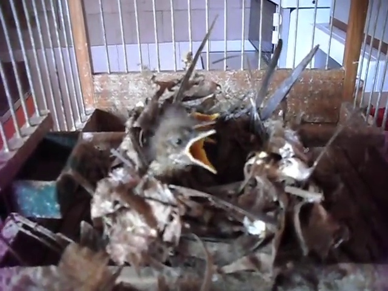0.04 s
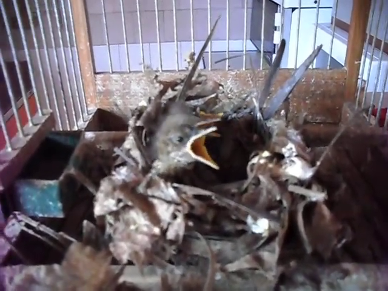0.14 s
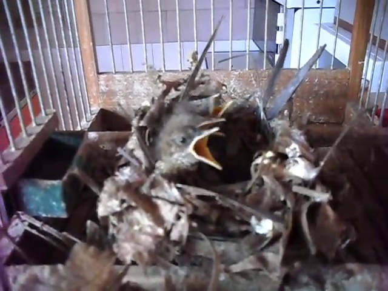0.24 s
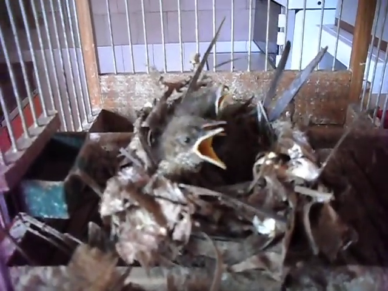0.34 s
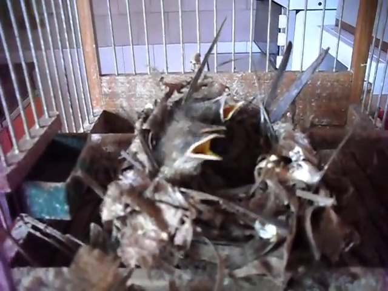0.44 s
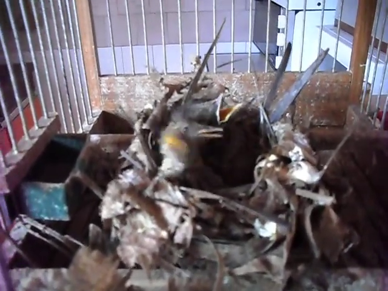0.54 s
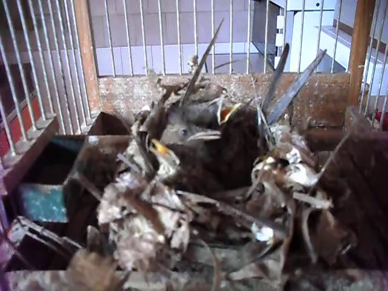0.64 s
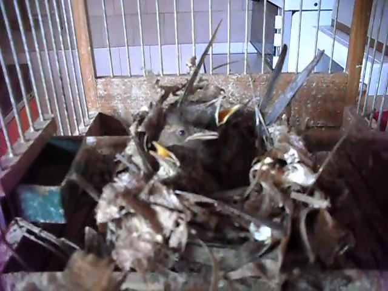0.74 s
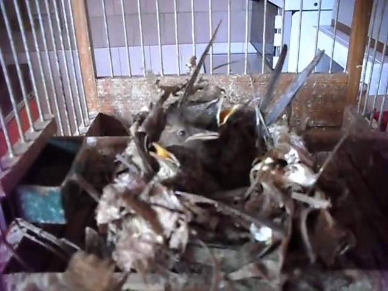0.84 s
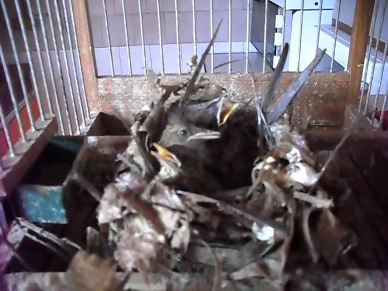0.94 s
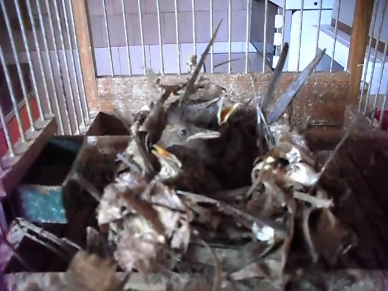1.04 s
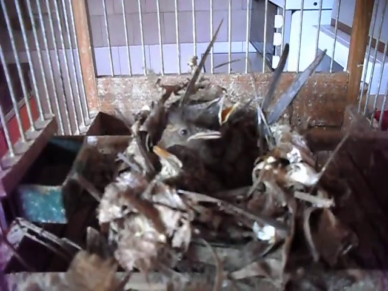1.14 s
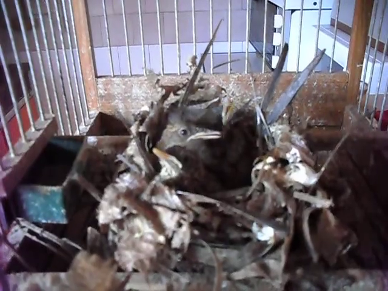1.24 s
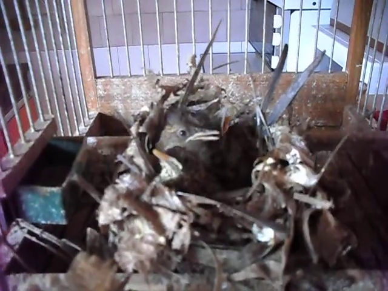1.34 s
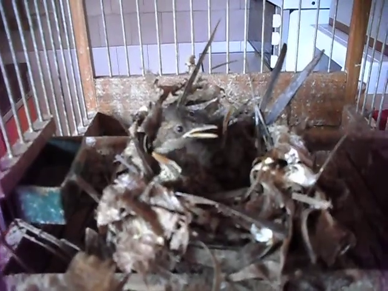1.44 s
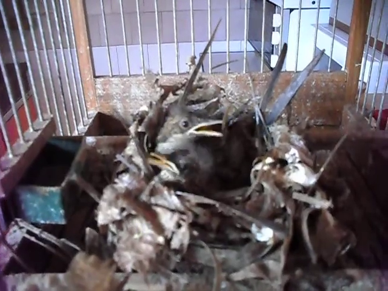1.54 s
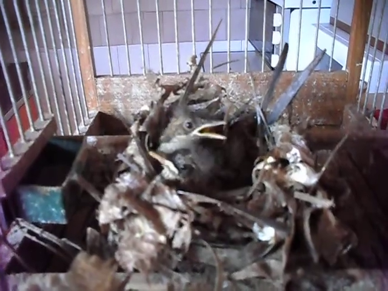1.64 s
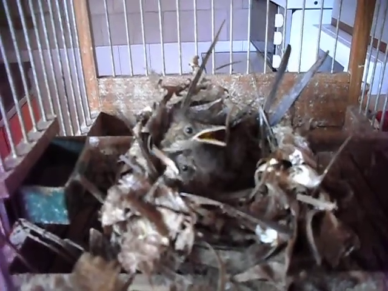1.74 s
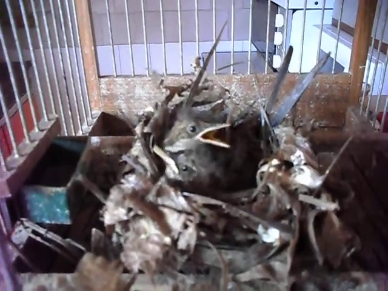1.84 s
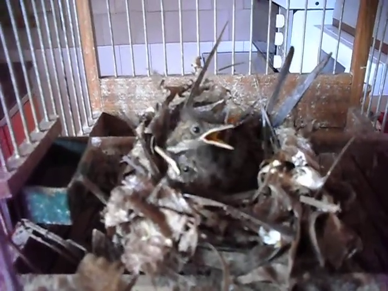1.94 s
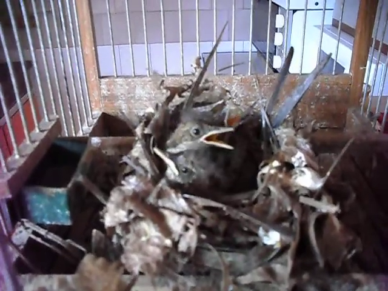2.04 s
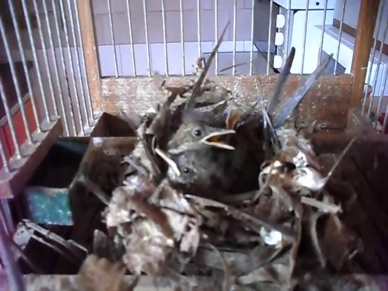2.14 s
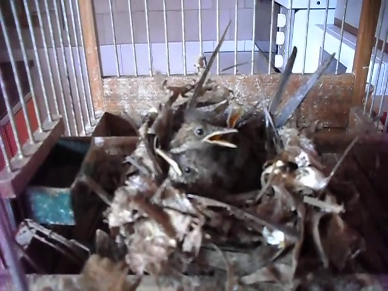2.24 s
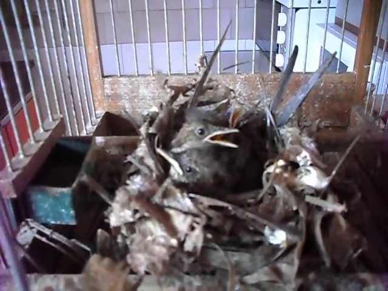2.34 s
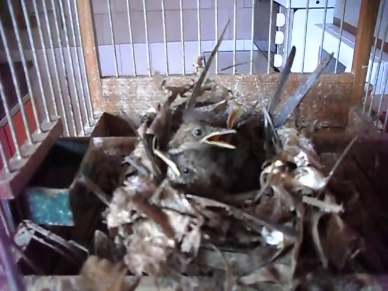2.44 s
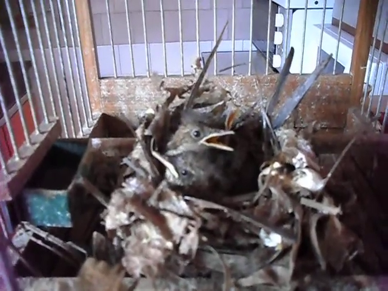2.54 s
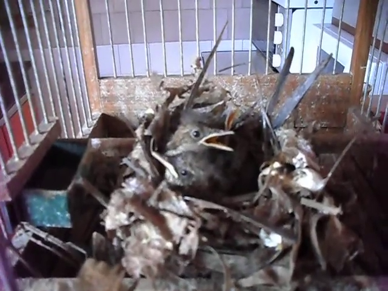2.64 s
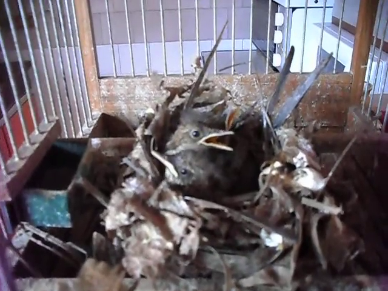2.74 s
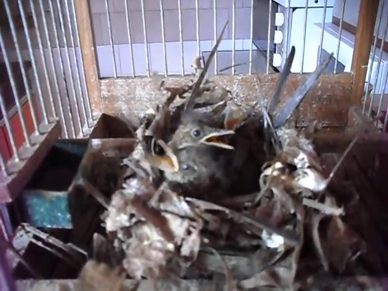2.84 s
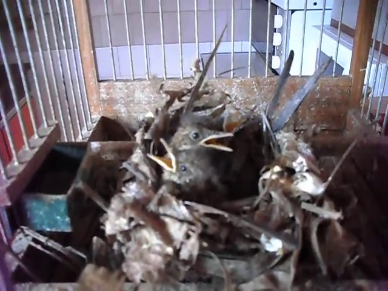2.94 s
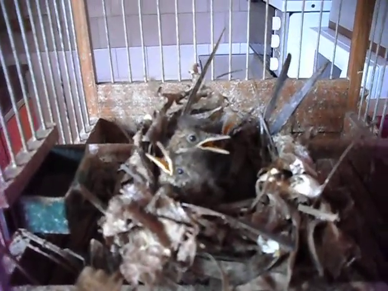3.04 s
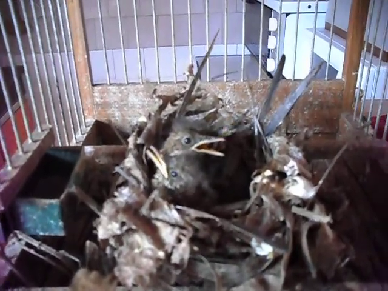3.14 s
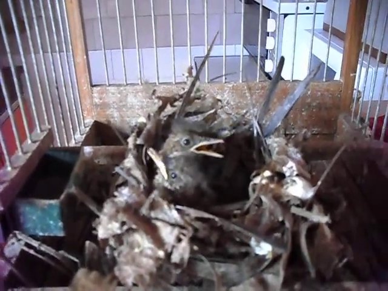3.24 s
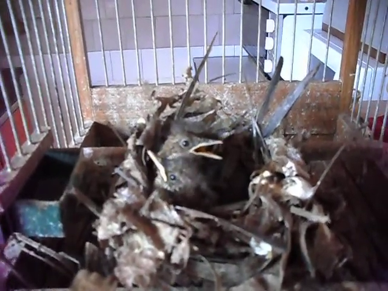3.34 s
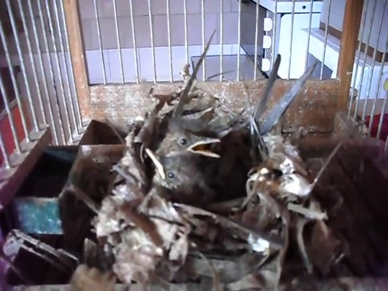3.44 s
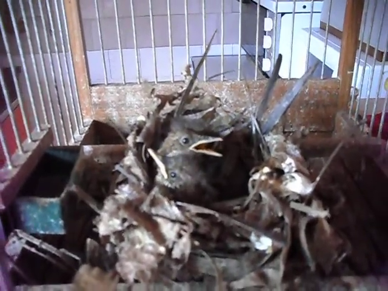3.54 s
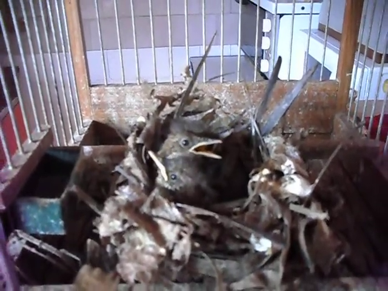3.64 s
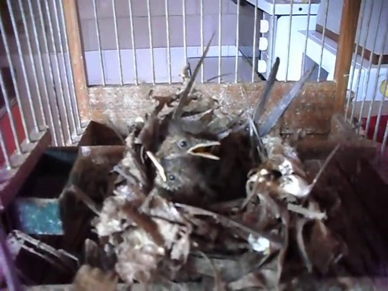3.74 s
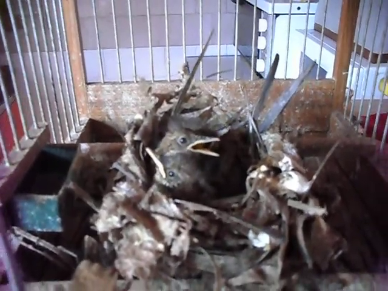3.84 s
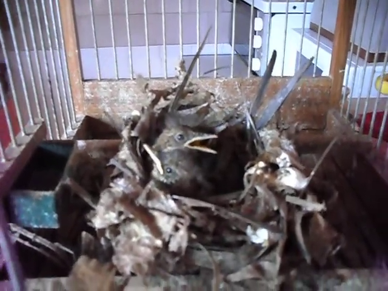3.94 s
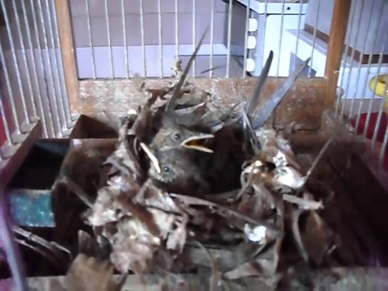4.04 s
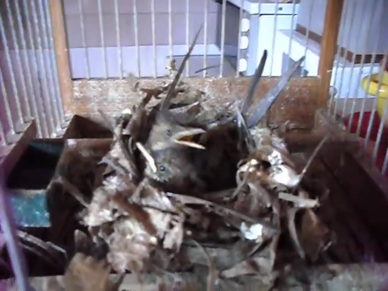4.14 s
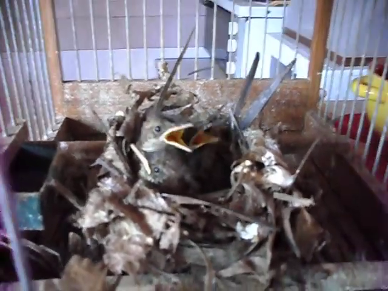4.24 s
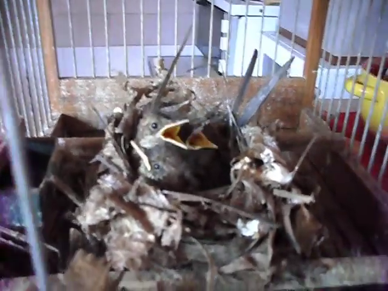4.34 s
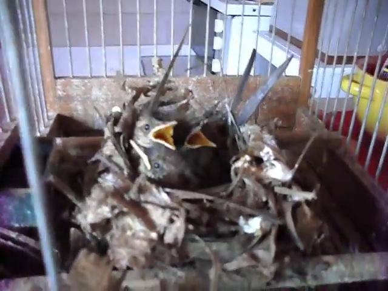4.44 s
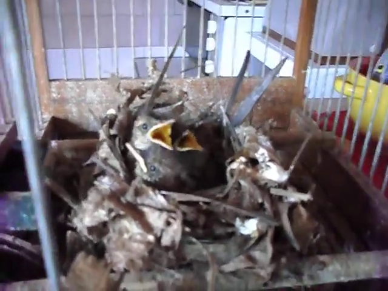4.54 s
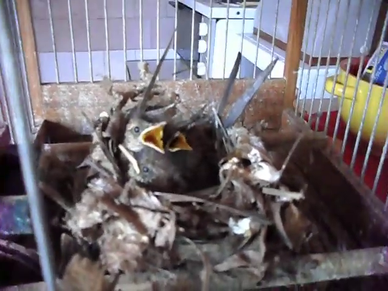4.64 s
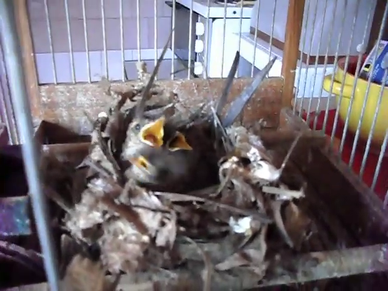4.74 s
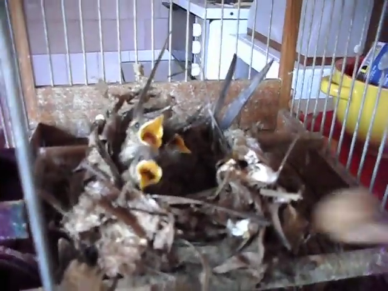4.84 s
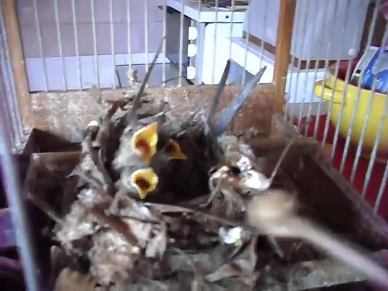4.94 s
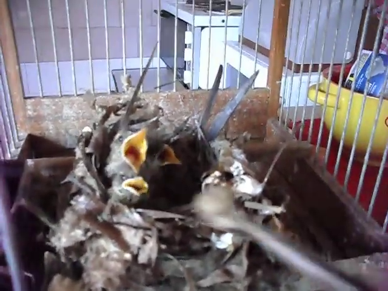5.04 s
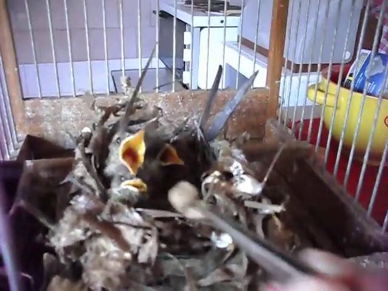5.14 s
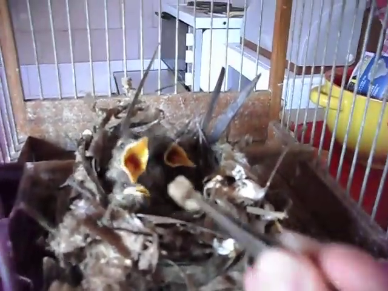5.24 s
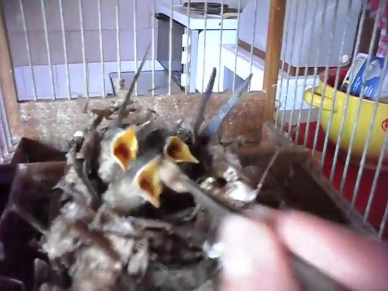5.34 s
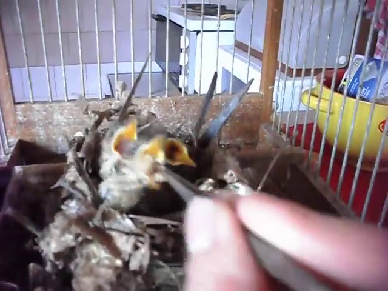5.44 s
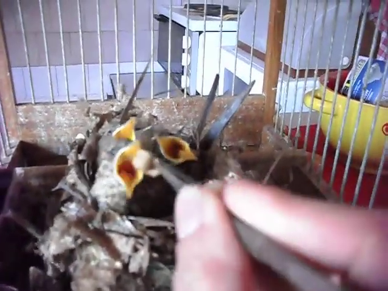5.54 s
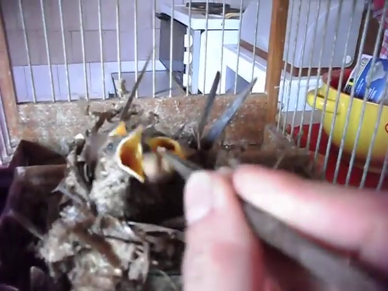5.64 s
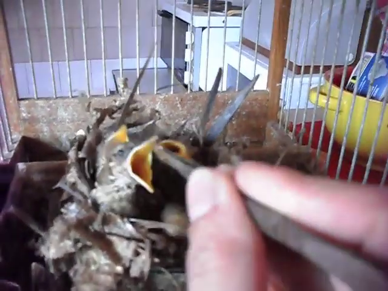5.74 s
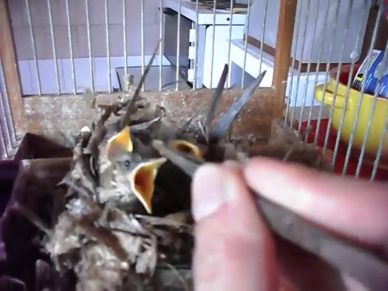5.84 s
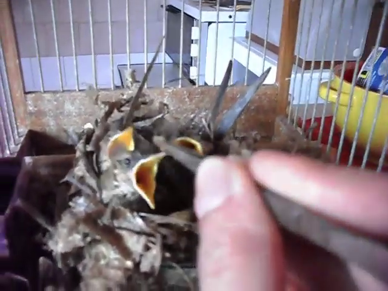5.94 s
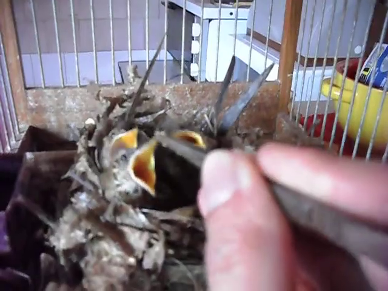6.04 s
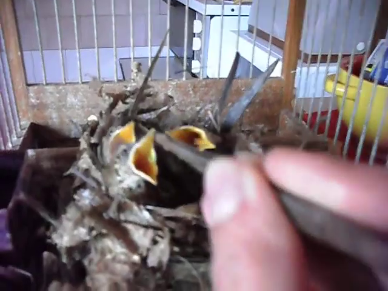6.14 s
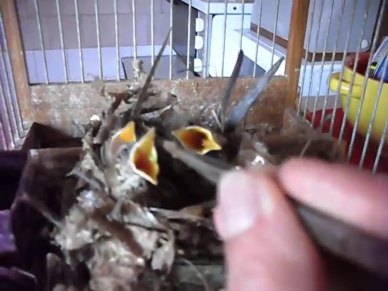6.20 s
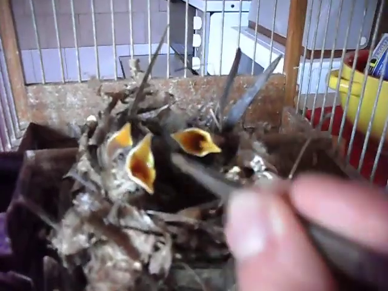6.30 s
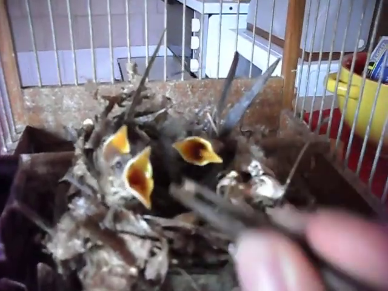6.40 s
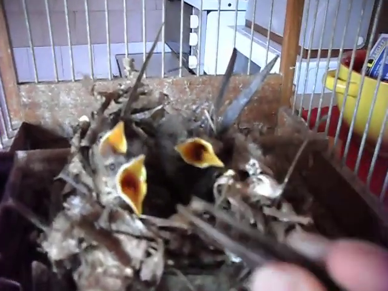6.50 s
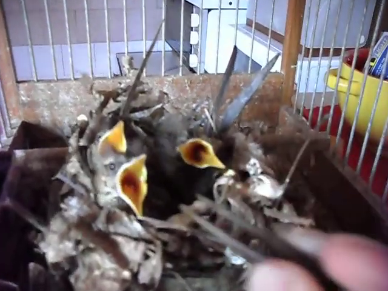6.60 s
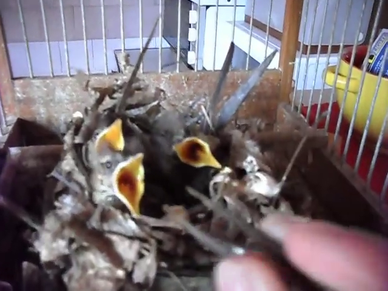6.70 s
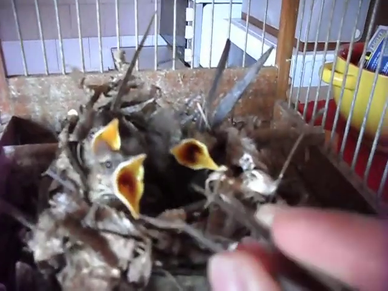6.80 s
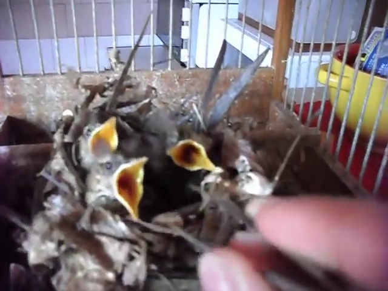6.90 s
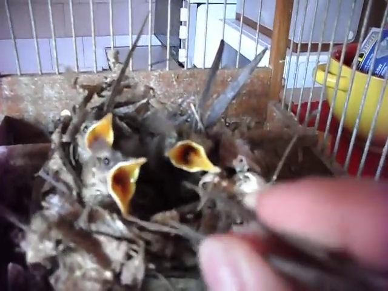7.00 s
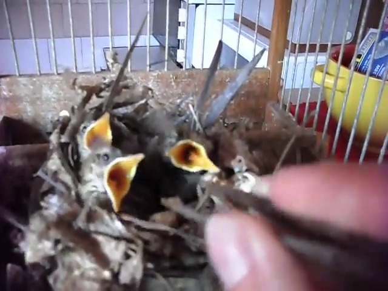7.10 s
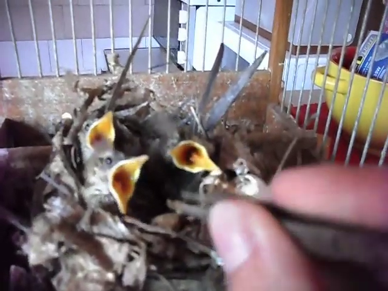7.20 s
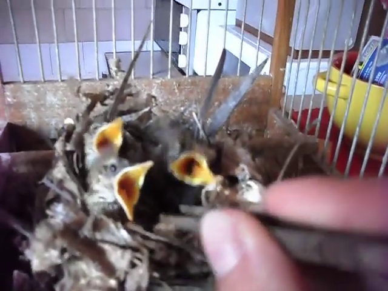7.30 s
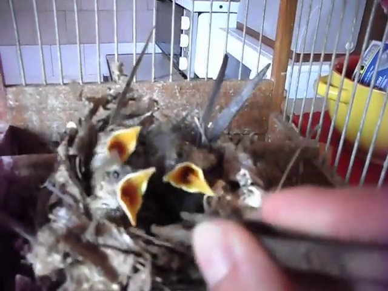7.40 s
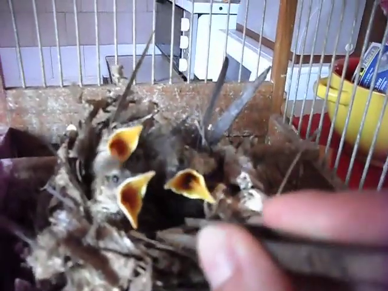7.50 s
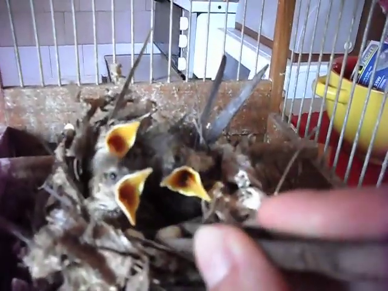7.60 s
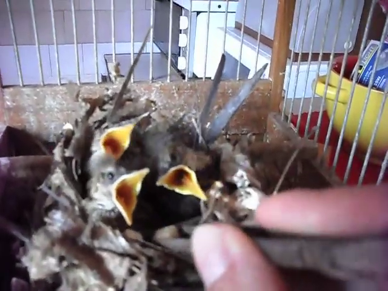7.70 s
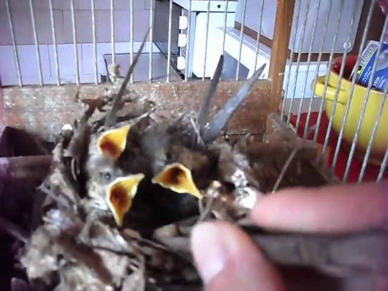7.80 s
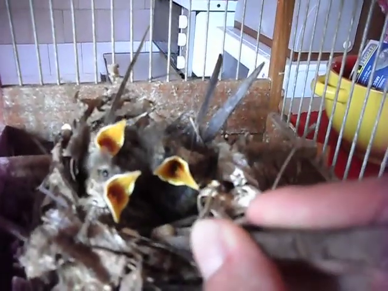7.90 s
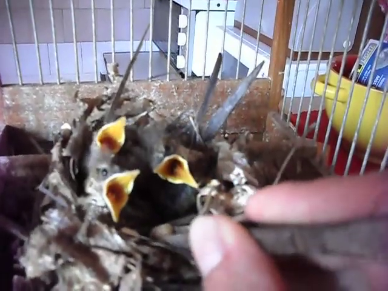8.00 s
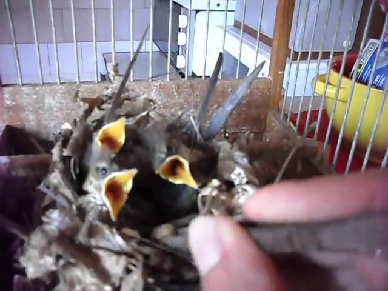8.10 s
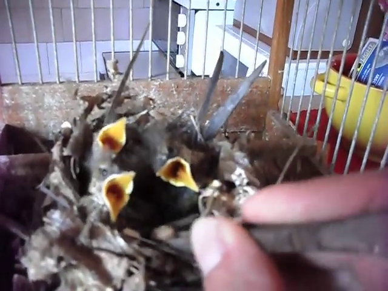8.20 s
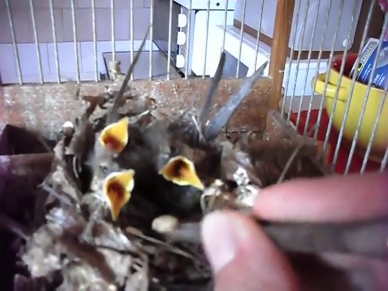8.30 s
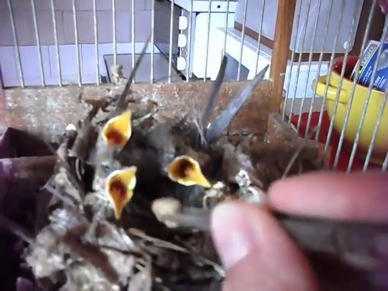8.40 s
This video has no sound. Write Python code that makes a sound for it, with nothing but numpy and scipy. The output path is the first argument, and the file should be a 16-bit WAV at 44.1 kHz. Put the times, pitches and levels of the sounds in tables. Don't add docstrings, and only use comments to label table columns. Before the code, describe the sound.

A compact camera close to a nest picks up irregular shrill chirps and rough clicking chacks, with quieter gaps of tiny peeps. A short flurry of chacks leads into frantic begging: two main chicks calling about eight times a second each, pitches swooping down and up, interleaved and piercing, the loudest squeaks slightly clipped. A few tiny dry ticks hide below. Short bright kitchen reflections, constant soft hiss and faint low hum.

```python
import sys
import numpy as np
from scipy import signal
from scipy.fft import rfft, irfft, next_fast_len
from scipy.io import wavfile
from scipy.ndimage import uniform_filter1d

SR = 44100
rng = np.random.default_rng(int(sys.argv[2]) if len(sys.argv) > 2 else 0)


def field_ratio(decibels):
    return 10 ** (np.asarray(decibels, dtype=float) / 20)


def digitize_waveform(pressure):
    field = np.atleast_2d(pressure).T
    bounded = np.clip(field, -1, 1)
    quanta = np.round(bounded * 32767).astype(np.int16)
    wavfile.write(sys.argv[1], SR, quanta)


N = 373086
CHANCE = rng.standard_normal(N + SR)

# frequency_hz, density_db [dB per Hz]
HISS_SPECTRUM = [(25, 5.5), (300, -7.5), (700, -11.5), (2100, -16), (10500, -24.5), (11500, -47),
                 (13000, -72)]
# frequency_hz, level_db
DRIVE_HUM = [
    (30.2, -53.5),
    (60.4, -63),
    (123, -72),
]
# start_s, beat_s, opening_fall_db, arch_db, arch_top_hz
SHORT_CALLS = [(.045, .034, -19.5, -13.5, 9240), (.686, .031, -26, -24, 8280),
               (1.268, .032, -25, -24, 7850), (2.016, 0.032, -29.5, -25, 8480),
               (2.158, .031, -25, -23, 8360), (2.798, 0.03, -22, -26, 7500), (2.9, .0275, -19, -17, 9640),
               (2.932, .0285, -40, -15, 9300), (3.007, .0315, -20, -16, 9000),
               (4.175, 0.027, -25, -43, 7850), (4.672, .029, -28, -24.5, 10030),
               (4.896, 0.028, -17.5, -14, 9900), (5.267, 0.024, -28, -30.5, 7640)]
# start_s, beat_s, opening_fall_db, arch_db, arch_top_hz
LONG_CALLS = [(.372, 0.028, -25, -23, 8600), (.53, 0.028, -26, -24, 8200), (1.119, 0.025, -22, -24, 8000),
              (4.313, .027, -29, -23.5, 8280), (4.787, .0295, -17, -14, 10120),
              (5.313, 0.026, -22, -14.5, 8600)]
# start_s, beat_s, opening_fall_db, arch_db, arch_top_hz
BOLD_CALLS = [(5.342, 0.028, -16, -20, 9500), (5.44, 0.041, -21, -20, 9000), (5.542, .028, -17, -14, 11000),
              (5.677, 0.022, -19.5, -16, 11200), (5.811, .027, -19.5, -16, 10600),
              (5.934, 0.03, -17.5, -16.5, 10200), (6.058, 0.03, -17.5, -17.5, 10400),
              (6.181, 0.027, -17, -16.5, 9700), (6.303, 0.03, -14.5, -16, 10800),
              (6.43, .028, -17, -16.5, 10200), (6.556, .0305, -19, -18, 9700),
              (6.676, .028, -14, -12, 9900), (6.8, .033, -14, -9, 9400), (6.934, 0.036, -10.5, -8, 9100),
              (7.06, .031, -12.5, -14, 9200), (7.183, 0.033, -15, -14.5, 10200),
              (7.303, .029, -18, -15.5, 9600), (7.432, 0.031, -17, -27.5, 8200),
              (7.573, 0.025, -17, -26, 8200), (7.703, 0.024, -17, -19, 8200),
              (7.836, 0.028, -16.5, -19.5, 9300), (7.972, 0.029, -16.5, -15, 9000),
              (8.25, 0.031, -16.5, -14.5, 9700), (8.38, 0.025, -19, -23, 8200)]
# start_s, beat_s, opening_fall_db, arch_db, arch_top_hz
STAIR_CALLS = [(5.43, 0.032, -18, -17, 8300), (5.575, 0.029, -17.5, -16, 8400),
               (5.712, 0.03, -15, -18, 8700), (5.85, 0.023, -17.5, -16.5, 8800),
               (5.985, .0245, -19, -18, 8700), (6.115, 0.026, -17, -17.5, 8500),
               (6.249, .027, -16, -17.5, 8100), (6.383, 0.029, -17.5, -19, 8300),
               (6.531, 0.027, -16, -25, 8400), (6.682, .028, -23, -24, 7400), (6.81, .0275, -17, -18, 9200),
               (6.945, 0.024, -22, -28, 8600), (7.083, 0.028, -15, -17.5, 8600),
               (7.229, 0.031, -19.5, -18, 8600), (7.376, 0.031, -15, -18.5, 8600),
               (7.521, .03, -16.5, -17.5, 8600), (7.665, 0.028, -16.5, -18.5, 8200),
               (7.814, 0.026, -18.5, -19, 8200), (7.956, 0.027, -18.5, -18, 8200),
               (8.116, .0285, -22, -21, 8300), (8.278, 0.026, -16.5, -17.5, 8800),
               (8.427, 0.031, -18, -18, 9600)]
# start_s, beat_s, opening_fall_db, arch_db, arch_top_hz
FAINT_CALLS = [(.036, 0.012, -30, -35, 9000), (.11, .02, -23, -35, 8000), (5.378, 0.032, -15, -21, 8600),
               (6.234, 0.039, -29, -33, 9000), (6.371, .026, -27, -38, 9000),
               (6.507, 0.028, -24.5, -29, 9400), (6.635, .025, -24, -32, 10200),
               (6.788, .025, -26, -33, 9000)]
# start_s, length_s, level_db, gape_hz
FADING_BREATH = (-0.15, 0.05, -37.5, 7500)
# start_s, level_db, gape_hz
CHACK_EVENTS = [(.208, -16.5, 5190), (.236, -13, 5630), (.275, -25, 5770), (.345, -14, 5600),
                (.501, -3, 4910), (.527, -21, 4400), (0.848, -20.5, 4640), (.878, -18, 4730),
                (1.001, -16, 4800), (1.028, -15, 5200), (1.479, -13, 3300), (1.503, -13, 3000),
                (3.115, -8.5, 4410), (3.144, -9, 3820), (3.208, -8, 4200), (3.272, -11, 2400),
                (3.296, -12, 2300), (5.05, -10.5, 5250), (5.077, -9.5, 4970), (5.109, -27, 4350),
                (5.163, -9, 4570), (5.188, -9.5, 4410), (5.208, -19.5, 5030), (5.23, -15.5, 5200)]
# start_s, top_hz, level_db
PEEP_EVENTS = [(1.417, 8170, -40.5), (1.534, 7040, -36), (1.7797, 6660, -40), (2.3136, 7300, -42.5),
               (2.488, 6600, -40.5), (3.453, 6930, -42), (3.607, 6400, -39.5), (3.754, 6600, -40.5),
               (3.874, 9200, -33), (4.055, 6800, -39.5)]
# time_s, pitch_hz, level_db
WHISTLE_VOICES = [
    [(1.851, 5260, -61), (1.858, 4430, -42), (1.875, 4800, -45)],
    [(1.879, 6660, -25), (1.895, 6770, -21), (1.9, 6480, -19), (1.922, 6790, -47)],
    [(2.77, 7800, -31), (2.782, 7480, -19), (2.818, 7690, -9), (2.828, 7470, -16), (2.836, 6470, -18),
     (2.85, 6370, -31)],
    [(2.77, 8830, -39), (2.78, 9090, -26), (2.806, 9100, -15), (2.826, 7800, -25)],
    [(4.193, 3900, -15), (4.201, 6670, -32), (4.208, 6770, -23), (4.222, 6260, -31)],
    [(5.0, 3730, -44), (5.035, 3700, -40)],
    [(8.093, 6440, -25), (8.102, 7085, -17), (8.136, 6973, -13.5), (8.154, 7250, -31)],
    [(8.09, 8470, -20), (8.108, 8870, -8), (8.14, 8420, -11.5), (8.153, 7040, -22)],
]
# start_s, level_db
TWEEZER_TICKS = [
    (6.179, -30),
    (6.838, -31),
    (7.071, -29),
    (8.115, -35.5),
]
# frequency_hz, gain_db
THROAT_RESPONSE = [(1000, -8.5), (1500, -7.5), (2500, -7.5), (4500, -6), (6000, -5), (9000, 0), (10300, -6),
                   (11000, -19), (12500, -12.5), (13200, -55)]
# frequency_hz, t60_s
ROOM_DECAY = [(2000, 0.27), (5000, 0.34), (10000, 0.27)]


def read(points, hz):
    table_hz, value = np.transpose(points)
    return np.interp(np.log(hz + 1), np.log(table_hz + 1), value)


def colour(x, points):
    size = next_fast_len(N)
    gain = field_ratio(read(points, np.fft.rfftfreq(size, 1 / SR)))
    return irfft(rfft(x, size) * gain, size)[:N]


def add(mix, s, sound):
    part = mix[max(round(s * SR), 0):][:len(sound)]
    part += sound[:len(part)]


def wobble(s, size, span):
    return uniform_filter1d(CHANCE[round(s * SR):][:size], span) * np.sqrt(span)


def phase(pitch):
    return 2 * np.pi * np.cumsum(pitch) / SR


def camera():
    hiss = colour(rng.standard_normal(N), HISS_SPECTRUM)
    out = field_ratio(-49.5) * hiss / hiss.std()
    t = np.arange(N) / SR
    for k, (hz, level_db) in enumerate(DRIVE_HUM):
        drift = 0.43 * wobble(k / 10, N, span=9000)
        out += np.sqrt(2) * field_ratio(level_db) * np.sin(2 * np.pi * hz * t + drift)
    return out


def tension(tops):
    tops, t = np.sort(tops), np.arange(N + SR) / SR
    after = np.clip(np.searchsorted(tops, t), 1, len(tops) - 1)
    slackening = np.exp(-abs(t - tops[after - 1]) / .007)
    tightening = 0.66 * np.exp(-abs(tops[after] - t) / 0.0057)
    return np.maximum(slackening, tightening)


def rasp(pull, s, length, level_db, gape_hz, fade_db, cut_db, pipe_db=0):
    t = np.arange(0, length + 0.0045, 1 / SR)
    slaps = wobble(s + .6, len(t), span=1) * field_ratio(-9)
    tight = 2.6 ** pull[round(s * SR):][:len(t)]
    for side_hz in (1750, 2700):
        slow = 0.078 * wobble(s + side_hz / SR, len(t), span=300)
        fast = 0.038 * wobble(s + .3, len(t), span=12)
        pitch = side_hz * tight * (1 + slow + fast)
        angle = phase(pitch)
        slaps = slaps + sum((k * pitch < 14000) * np.cos(k * angle) for k in range(1, 7)) / 2

    octaves = np.log2((np.fft.rfftfreq(len(t), 1 / SR) + 1) / gape_hz)
    above = np.minimum(cut_db * octaves ** 2, 42)
    below = np.minimum(5 * octaves ** 2, 14)
    loss_db = np.where(octaves > 0, above, below)
    if pipe_db == 0:
        loss_db = loss_db + 6 * np.sin(np.pi * (octaves + np.log2(gape_hz / 2450))) ** 2
    loss_db = loss_db + pipe_db * np.sin(np.pi * gape_hz * 2 ** octaves / 2350) ** 2
    voice = irfft(rfft(slaps * signal.windows.tukey(len(t), .1)) / field_ratio(loss_db), len(t))

    throb = field_ratio(2.45 * wobble(s + .2, len(t), span=250) - fade_db * t / length)
    onset = np.clip(t / 0.0013, 0, 1)
    release = np.clip((t[-1] - t) / 0.0085, 0, 1)
    return s, field_ratio(level_db) * voice / voice.std() * throb * onset * release


def warble(s, top, half, level_db, bottom, rising, reach, fade_db=5, rise_db=0):
    u = np.arange(-half * rising * reach, half * reach, 1 / SR) / half
    start = s - half * rising * reach
    fall = np.clip(abs(u), 0, 1)
    height = (1 + np.cos(np.pi * fall)) / 2 if rising else (1 - fall) ** 1.7
    pitch = bottom * (top / bottom) ** height
    angle = phase(pitch * (1 + (0.0158 + 0.041 * fall) * wobble(start, len(u), span=30)))

    overtones = sum((k * pitch < 13000) * np.cos(k * angle) for k in range(2, 6))
    fundamental = field_ratio(-fade_db * fall - rise_db * fall * (u < 0)) * np.cos(angle)
    voice = fundamental + field_ratio(-36.0) * fall * overtones
    onset = np.clip((u - u[0]) * half / (.005 if rising else .0015), 0, 1)
    release = np.clip((u[-1] - u) / 0.6, 0, 1)
    level = field_ratio(level_db + 3.04 * wobble(start + .9, len(u), span=60))
    return start, np.sqrt(2) * level * onset * release * voice


def phrase(calls, count, open_hz, open_share, deep, deep_db, open_deep, open_deep_db, rasp_db, gape, width, lead,
           fade_db, rise_db, cut_db, sag=1, tire_db=0, drag=1, deep_step_db=0, linger=.75, slack=.7):
    tones, breaths = [], []
    for s, beat, open_db, arch_db, arch_hz in calls:
        top = open_hz + open_share * arch_hz
        tones.append((s, top, .016, open_db, top / 2, 0, .79))
        tones.append((s + .004, open_deep * top, .013, open_db + open_deep_db, 1850, 0, 1.12, 6 * slack))
        breaths.append((s + .002, 0.71 * beat, open_db + rasp_db, gape * arch_hz, 2, cut_db))
        for k in range(count):
            at = s + beat * (1 + drag * k)
            top = arch_hz * sag ** k
            db = arch_db + tire_db * k
            low_db = arch_db + deep_db - deep_step_db * abs(k - 1)
            tones.append((at, top, width * beat, db, top / 2.2, 1, .75, fade_db, rise_db))
            tones.append((at + .001, deep * top, .6 * beat, low_db, 1750, 1, 1.2, slack * fade_db, .7 * rise_db))
            breaths.append((at - lead * beat, (linger + lead) * beat, db + rasp_db,
                            gape * arch_hz * sag ** (0.49 * k), 2, cut_db))
    return tones, breaths


def chacks():
    tones, breaths = [], []
    beak = (9, 27, 14)  # fade, cut and windpipe ring, dB
    for s, level_db, gape_hz in CHACK_EVENTS:
        tones.append((s, 1.7 * gape_hz, .012, level_db - 9, 1900, 0, 1.05))
        breaths.append((s, .01, level_db, gape_hz, *beak))
        breaths.append((s + .006, .03, level_db - 12, gape_hz, *beak))
    return tones, breaths


def nest():
    lone = dict(open_hz=2500, open_share=.86, deep=.8, open_deep=.78, lead=-.1, rise_db=6,
                fade_db=9, cut_db=22, width=.57, slack=1.7)
    stair = dict(open_hz=10600, open_share=0, deep=.74, deep_step_db=5, fade_db=8, rise_db=27,
                 sag=.77, tire_db=-6, drag=1.01, deep_db=-6, open_deep=.52, open_deep_db=-12,
                 rasp_db=-8.5, gape=.93, width=.5, lead=.2, cut_db=19, linger=1.15)
    fresh = 4
    parts = [
        phrase(SHORT_CALLS, count=1, **lone, deep_db=-2, open_deep_db=-4, rasp_db=-5, gape=.55),
        phrase(LONG_CALLS, count=2, **lone, sag=.85, tire_db=-7, drag=1.14, deep_db=-8, deep_step_db=-5,
               open_deep_db=-5, rasp_db=-5.5, gape=.62),
        phrase(BOLD_CALLS, count=1, open_hz=11800, open_share=0, deep=.66, fade_db=9, rise_db=18,
               deep_db=-10.5, open_deep=0.41, open_deep_db=-13, rasp_db=-10, gape=.86, width=.55, lead=.2,
               cut_db=19, linger=.85),
        phrase(STAIR_CALLS[:fresh], count=3, **stair),
        phrase(STAIR_CALLS[fresh:], count=2, **stair),
        phrase(FAINT_CALLS, count=1, open_hz=10400, open_share=0, deep=.5, deep_db=-9, open_deep=0.58,
               open_deep_db=-16, rasp_db=-11, gape=0.69, width=.4, lead=0.26, fade_db=11, rise_db=12, cut_db=17),
        chacks(),
        ([], [(*FADING_BREATH, 2, 17)])]
    tones, breaths = [sum(side, []) for side in zip(*parts)]
    return tones, breaths


def peep(s, top_hz, level_db):
    return warble(s, top_hz, .013, level_db, 4205, rising=0, reach=1.56)


def whistle(rows):
    s, hz, level_db = np.transpose(rows)
    t = np.arange(s[0], s[-1], 1 / SR)
    angle = phase(np.interp(t, s, hz) * (1 + 0.0055 * wobble(s[0], len(t), span=40)))
    level = np.sqrt(2) * field_ratio(np.interp(t, s, level_db))
    return s[0], level * np.cos(angle) * signal.windows.tukey(len(t), .12)


def wheeze():
    start = 5.94
    t = np.arange(0, .76, 1 / SR)
    pitch = np.interp(t, [0, .5, .7], [2500, 2600, 3500]) * (1 + .16 * wobble(start, len(t), span=25))
    return start, field_ratio(-30 - 5.0 * t) * np.cos(phase(pitch)) * signal.windows.tukey(len(t), .15)


def chicks():
    out = np.zeros(N)
    tones, breaths = nest()
    pull = tension([row[0] for row in tones])
    for row in breaths:
        add(out, *rasp(pull, *row))
    for row in tones:
        add(out, *warble(*row))
    for row in PEEP_EVENTS:
        add(out, *peep(*row))
    for rows in WHISTLE_VOICES:
        add(out, *whistle(rows))
    add(out, *wheeze())
    return out


def tweezers():
    out, t = np.zeros(N), np.arange(400) / SR
    modes = sum(np.sin(2 * np.pi * hz * t) for hz in (750, 1400, 2300, 3900))
    click = field_ratio(-60 * t / 0.009) * modes
    for s, level_db in TWEEZER_TICKS:
        add(out, s, field_ratio(level_db) * click)
    return out


def kitchen(x):
    taps = np.zeros(SR // 2)
    at = np.arange(130, len(taps) - 20, 20)
    taps[at + rng.integers(0, 20, len(at))] = rng.choice([-1., 1.], len(at))
    hz, t, bands = signal.stft(taps, SR, nperseg=128)
    decay = field_ratio(-60 * t / read(ROOM_DECAY, hz)[:, None])
    tail = signal.istft(bands * decay, SR, nperseg=128)[1]
    cage = taps[:900] * field_ratio(-60 * np.arange(900) / SR / 0.0072)
    space = field_ratio(-14.5) * tail / np.linalg.norm(tail)
    add(space, 0, field_ratio(-11.0) * cage / np.linalg.norm(cage))
    return x + signal.fftconvolve(x, space)[:N]


def scene():
    birds = colour(chicks(), THROAT_RESPONSE)
    return (kitchen(birds + tweezers()) + camera())[None]


def top_cut(x):
    return signal.sosfilt(signal.butter(12, 15700, fs=SR, output="sos"), x)


def record(dry):
    mix = np.clip(dry, -.7, .7)
    return top_cut(mix)


dry = scene()
out = record(dry)
digitize_waveform(out)
```